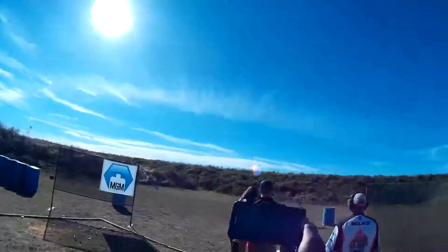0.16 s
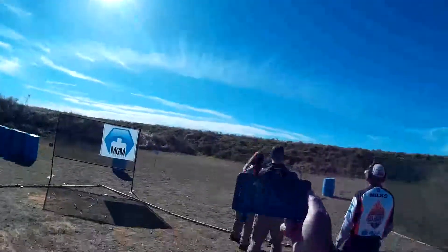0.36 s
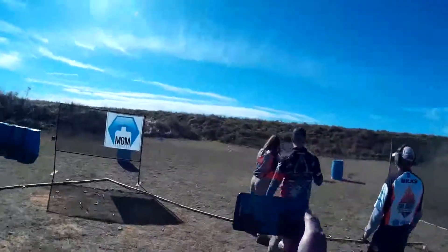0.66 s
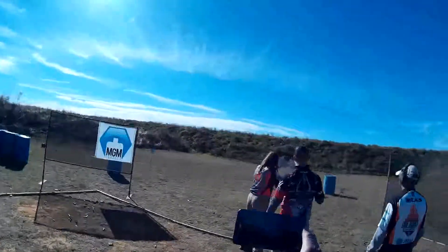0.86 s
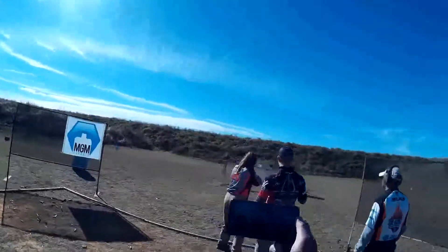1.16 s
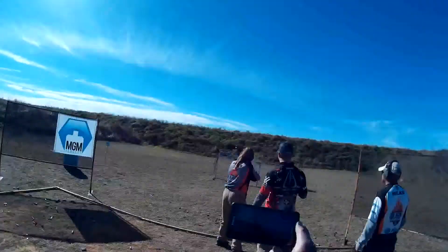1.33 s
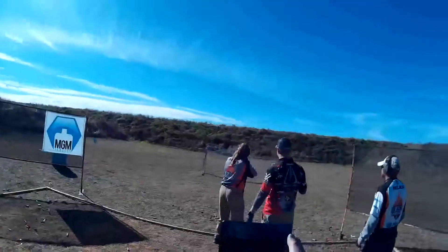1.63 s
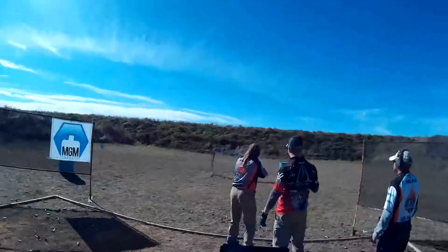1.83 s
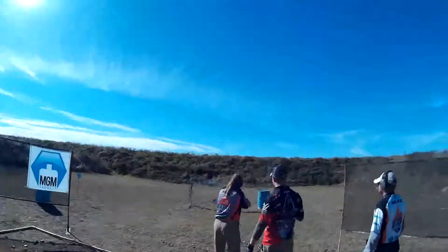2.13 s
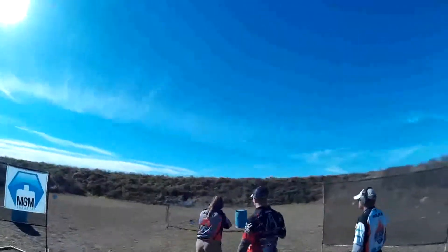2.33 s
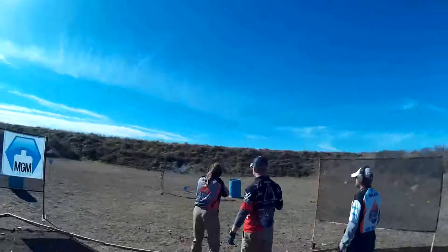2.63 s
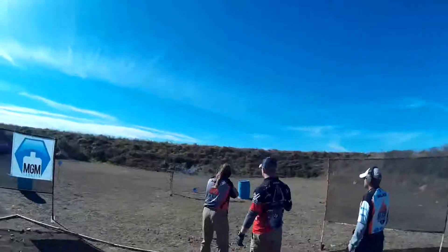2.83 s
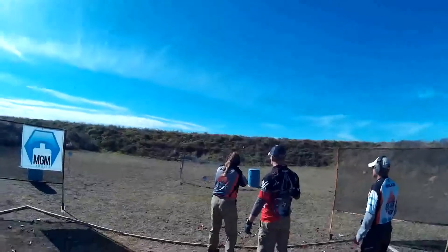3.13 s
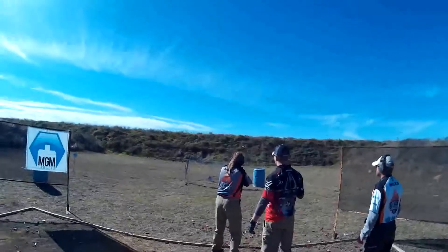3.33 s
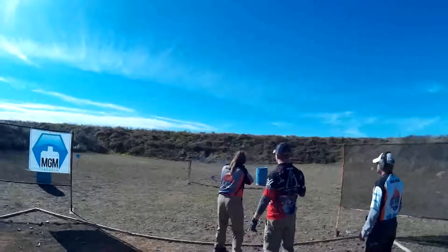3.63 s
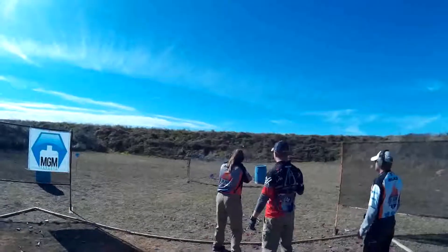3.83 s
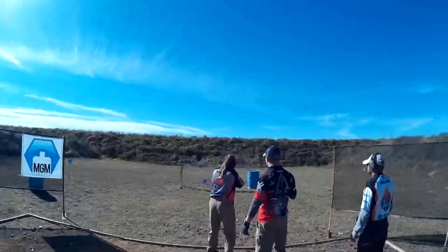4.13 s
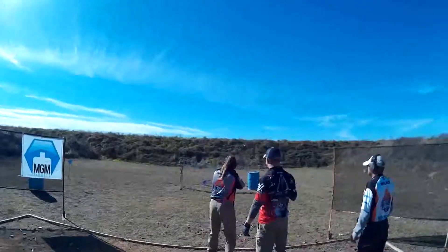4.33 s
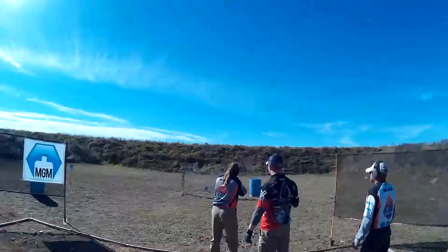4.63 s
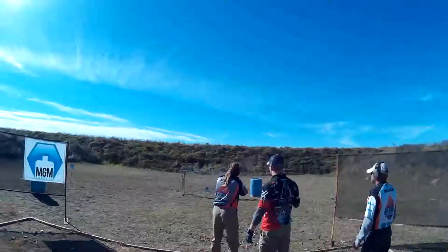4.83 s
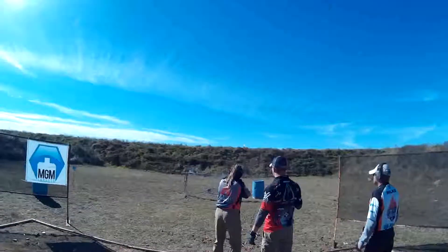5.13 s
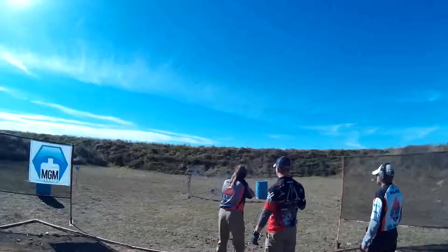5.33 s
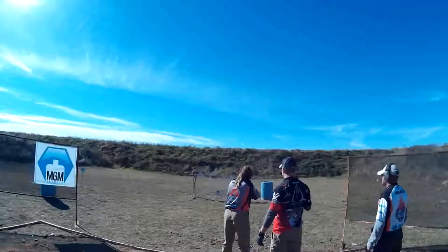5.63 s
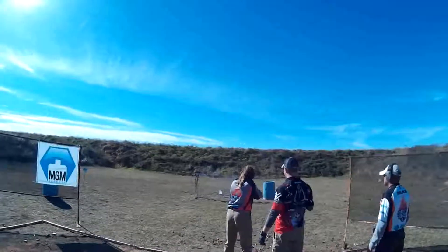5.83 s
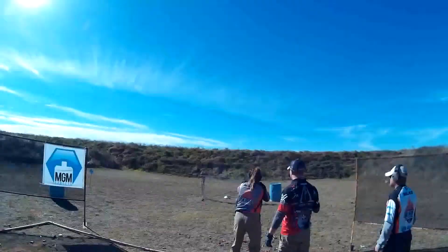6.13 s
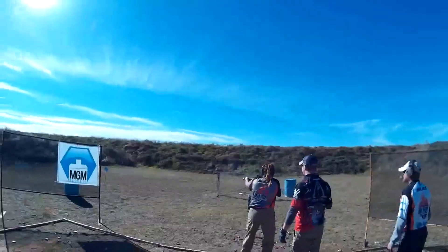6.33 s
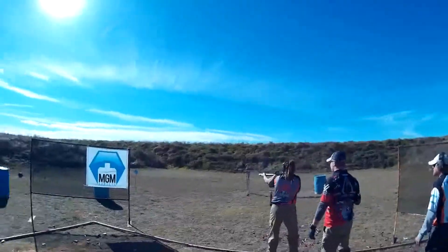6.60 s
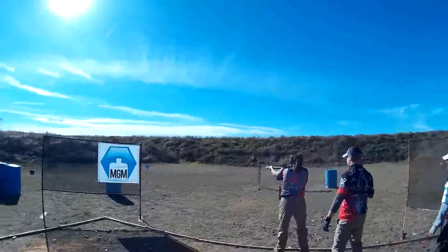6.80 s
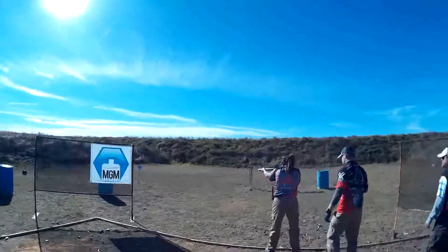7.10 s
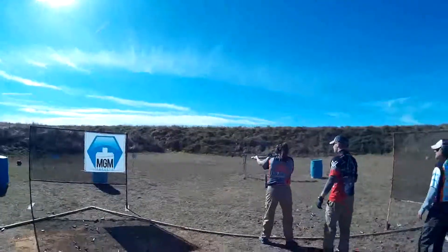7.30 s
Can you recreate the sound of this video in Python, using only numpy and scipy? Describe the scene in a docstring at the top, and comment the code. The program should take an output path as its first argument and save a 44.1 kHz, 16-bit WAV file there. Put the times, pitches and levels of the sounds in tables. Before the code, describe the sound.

Close, distorted handgun shots crack on an open-air range, a bit over half a second apart. The first five each strike a small steel plate with a bright ping and a clanking fall. Later shots are slightly slower, some without a hit, others ringing narrower or larger plates. After a pause with faint ticks, one last shot ends it. Short slap echoes return from earth banks; light wind fills the gaps.

```python
"""Handgun and steel plates

A handgun fires at steel plates on an open range walled by earth banks, a few metres from the microphone.
Blasts are short damped tones that overload the input, with barrel and screen echoes and noise off the banks.
Struck plates are beating sine modes, damped on landing; falls are resonant noise, knocks damped tones.
A light wind of coloured noise fills the gaps."""
import sys
import numpy as np
from scipy import signal
from scipy.fft import rfft, irfft, next_fast_len
from scipy.io import wavfile
from scipy.ndimage import uniform_filter1d, map_coordinates

SR = 44100
rng = np.random.default_rng(int(sys.argv[2]) if len(sys.argv) > 2 else 0)


def pcm_store(signal):
    """Save signal as 16-bit PCM."""
    levels = np.round(np.clip(np.atleast_2d(signal), -1, 1) * 32767)
    wavfile.write(sys.argv[1], SR, levels.astype(np.int16).T)


N = 328986

# Shots: (time [s], level [dB], near echo gain [dB], bank gain [dB], direct path gain [dB],
# gain of later scatter off shooter and ground [dB], lag of the first echoes [s])
SHOTS = [(0.3043, -0.5, -4, 0.5, -7, 2, -0.0042), (0.9386, 2, -0.5, -1.5, 3.5, -1, -0.0025),
         (1.5003, 1.5, 2, 0, 10.5, 2, .0004), (2.0199, -0.5, 1, 2, 4.5, 4, -0.002),
         (2.6244, -1.5, -0.5, 1.5, 9, 1.5, 0.0054), (3.321, -2, -1, 0.5, -4.5, 4.5, -0.0017),
         (4.1754, -2, -0.5, 2, -16, -2, .0002), (4.864, -0.5, 1.5, 2, 3, 4.5, -0.0016),
         (5.7102, -0.5, -3, -2, -7.5, 0.5, -0.0024), (7.4159, -2, 4.5, 3.5, -10.5, 5.5, -0.00045)]
# Direct blast: (level [dB], ring [Hz], T60 [s])
DIRECT_PATH = (2.1, 1600, .005)
# Echoes from barrels and screens, then from the banks: (delay [s], level [dB], T60 [s])
ECHO_PATHS = [(.032, 1, .006), (.0352, 4, .006), (.038, -2, .007), (.041, -2, .007), (0.0436, 5, .014),
              (.145, -17, .013), (.172, -16.5, .015), (.184, -13, .013), (.193, -20, .015),
              (.2445, -24, .012), (.34, -26.5, 0.015)]
# Diffuse swells off ground and banks: (delay [s], level [dB], fade [dB/s], extra treble [dB])
BANK_SWELLS = [(.001, -7.5, 596.5, 11), (.031, -12, 480, -7.5), (.05, -25, 82.5, 5.5),
               (.126, -28.5, 197, 9), (.165, -23, 256.5, 2.5), (.243, -30, 170.5, 10), (.3, -40, 71, 5)]
# Colour of the diffuse answer: (frequency [Hz], density [dB per Hz])
BANK_SPECTRUM = [(35, -60.5), (60, -32.5), (217, -9), (607, -7.5), (882, -3), (1280, -7.5), (2190, -15.5),
                 (2650, -25.5), (3760, -18.5), (6000, -24), (7750, -28.5), (8710, -34), (14200, -39),
                 (16000, -69)]

# Bullet strikes: (time [s], splash [dB], splash treble [dB], knock [dB], plate, ring [dB],
# ring treble [dB], extra fade [dB/s], edge-on after [s], back face gain [dB],
# extra back face fade [dB/s], lands after [s])
STRIKES = [(.3525, -14, -10.5, -6, "small", 0, 5.5, 1.5, .229, 3, 119, .33),
           (0.987, -29, -13, -1, "small", -2, 0.5, 68, 0.238, 16, 300, 0.34),
           (1.5494, -17.5, -10.5, -4, "small", -1.5, -2, 85, 0.233, 28.5, 550, 0.39),
           (2.067, -14, -9, -10, "small", -20.5, 21.5, 58.5, .228, 15, 57.5, .33),
           (2.6747, -12, -8, -12, "small", -23, 3.5, 67, .228, 4, 60, 0.28),
           (4.224, -15, 3, -16.5, "narrow", 2.4, -2.1, 1.1, 0.138, 0.8, 6.5, .37),
           (4.9123, -15.5, 1, -8, "narrow", -4.5, 0, 42.5, 0.25, 8, 5, .33),
           (5.764, -18, 1, -23, "large", -1.8, -1.7, -1.8, 0.098, -0.05, -3.5, .355)]
# Splash colour: (frequency [Hz], density [dB per Hz])
SPLASH_SPECTRUM = [(500, -25.5), (1200, -12), (1900, 2.5), (3200, -15.5), (4200, -3), (8000, -8),
                   (11000, -6.5), (15000, -18)]
# Plate modes, levels relative within a ring group: (frequency [Hz], level [dB])
SMALL_MODES = [(4544, -1), (7515, 5), (10900, -30.5), (12130, -34), (13390, -22.5)]
NARROW_MODES = [(4683, -0.5), (5690, -7), (7725, 6.5), (7989, 2.5), (8080, -6.5), (8732, -13.5), (10510, 1),
                (10810, -6.5), (11180, -17.5), (11460, -5), (12420, -5.5), (13770, -12.5)]
LARGE_MODES = [(839.8, -49), (990.5, -24), (1567, -36.5), (2083, -35.5), (2390, -44), (3004, -46),
               (3784, -36.5), (4000, -47.5), (4301, -53.5), (4915, -64), (5259, -41), (6342, -59.5),
               (6713, -44), (6955, -45.5), (7063, -46), (8021, -54), (8807, -68.5), (9453, -60.5),
               (9588, -54.5), (10454, -56.5), (10831, -47.5), (10885, -49), (11353, -69), (11795, -67),
               (12118, -69), (12349, -61), (12575, -65), (12818, -59)]
# Ring of each mode group: (upper limit [Hz], level [dB], fade [dB/s], beat [1/s], beat peak [s],
# beat depth [0-1], edge-on dip [0-1], back face gain [dB], landing drop [dB])
SMALL_GROUPS = [(6000, -30.5, 1, 5.2, .03, 0, 1, 1.2, 25.5), (20000, -32, 46, 15, .06, .5, 0.9, -4.5, 28)]
NARROW_GROUPS = [(5200, -35, 49, 8.2, .09, 0.18, 0.15, 1, 15), (6500, -32, 61, 7, 0.081, .8, .2, -1.5, 15),
                 (9500, -29, 55.4, 8.2, .07, .4, 0.48, 2, 15),
                 (20000, -28.5, 130, 11, .07, .4, 0.17, -1.5, 17)]
LARGE_GROUPS = [(1200, -27, 5, 5.6, 0.204, .8, .8, 11.4, 14.6), (1800, -33, 5, 3.9, .26, .6, .8, 4, 17),
                (2700, -39, 30, 9, .15, .4, .8, 16, 11.7), (3400, -19.5, 110, 9.5, 0.065, .7, 0.54, 1.7, 8),
                (3900, -17.5, 68, 9.8, 0.055, .85, .2, 3.8, 2.3), (4800, -28, 56, 7.3, .02, .4, .4, 0.3, 5),
                (5800, -29, 60, 4.1, 0.15, 0.4, .1, 3.5, 5), (7500, -23, 74, 5.4, 0.02, 0.5, .5, 10, 5.5),
                (20000, -24.5, 106, 5.2, 0.022, .8, .5, 14, 8.4)]
PLATES = {"small": (SMALL_MODES, SMALL_GROUPS), "narrow": (NARROW_MODES, NARROW_GROUPS),
          "large": (LARGE_MODES, LARGE_GROUPS)}

# Landings and bounces: (time [s], level [dB], T60 [s], treble [dB], pitch ratio of low resonances [-])
FALLS = [(.665, -6.5, 0.33, -8.5, 0.99), (.74, -21, 0.42, -5.5, 0.93), (0.802, -13.5, 0.29, -8.5, 1.06),
         (1.322, -8.5, 0.55, -4, 0.96), (1.391, -13, 0.23, -7, 1.07), (1.875, -4, 0.34, -2.5, 1.04),
         (1.983, -13, 0.42, -18.5, 1.06), (2.009, -13, 0.32, -1.5, 0.86), (2.611, -13, 0.81, -1.5, 1.02),
         (4.599, -5.5, 0.41, 2.5, 1.08), (4.737, -12, 0.29, 0, 1.03), (5.249, -5, 0.29, 2, 1.015),
         (5.335, -16, 0.16, 2, 1.07)]
# Clatter colour: (frequency [Hz], density [dB per Hz])
CLATTER_SPECTRUM = [(88, -70), (150, -38.5), (331, -17.5), (515, -22), (972, -3.5), (1350, -16.5),
                    (1770, -0.5), (3150, -21.5), (3970, -8.5), (4460, -23.5), (4810, -15.5), (10200, -31.5),
                    (15000, -54)]
# Narrow and broad resonances of plate and stand: (frequency [Hz], width [Hz], level [dB])
FRAME_RESONANCES = [(890, 100, -10), (1604, 28, 2), (2440, 56, -6), (4160, 84, -11), (5300, 400, -8),
                    (5400, 400, -8), (8000, 100, -16.5), (11200, 1000, -24)]
# Faint ticks and knocks: (time [s], level [dB], frequency [Hz], click [dB])
TICKS = [(.04, -33, 726, -24), (.119, -45, 670, -28), (3.133, -45, 1810, 1.5), (6.346, -31, 940, -27.5),
         (6.439, -36, 975, -28), (6.67, -40.5, 940, -21), (6.855, -43, 955, -11), (6.963, -43, 886, -22.5)]
# Dull thuds: (time [s], level [dB], frequency [Hz])
THUDS = [(1.103, -17, 197), (3.487, -2, 249)]
# Wind levels: (time [s], rumble [dB], rustle [dB])
WIND_LEVELS = [(0, -67, -47), (0.299, -50.5, -56), (1.999, -66, -58), (3.999, -63, -60),
               (5.601, -57, -55.5), (6.401, -59, -54.5), (7.46, -59, -58.5)]
# Wind colours: (frequency [Hz], density [dB per Hz])
RUMBLE_SPECTRUM = [(20, -33), (50, -3), (80, 2), (120, -4), (250, -36.5)]
RUSTLE_SPECTRUM = [(100, -7), (180, -2.5), (400, -7), (950, -7.5), (1500, -15.5), (2500, -27.5),
                   (4000, -30), (8000, -41.5), (16000, -55)]

# Scatter off shooter and ground: delay, loss and pitch step up per arrival
SCATTER_DELAY_S, SCATTER_DELAY_RATIO, SCATTER_DB, SCATTER_LOSS_DB = .002, 1.53, 11.5, 2.5
SCATTER_HZ, SCATTER_HZ_RATIO, SCATTER_MAX_HZ, SCATTER_T60_S = 390, 1.33, 1287, .0099
ECHO_HZ, BITE_LOSS_DB_PER_S = 973, 60.5  # far echoes arrive rounder
BANK_RISE_S = .0015
THUMP_DB, THUMP_DELAY_S, THUMP_S, SETTLE_S = -14, .002, .004, .06
KNOCK_HZ, KNOCK_T60_S = 1660, .022
EDGE_ON_S, LANDING_S, LYING_FADE_DB_PER_S, WAVER_DB = .011, .015, 74, 2.35
NOTCH_HZ, NOTCH_WIDTH_HZ, NOTCH_DEPTH = 3196, 180, .41
CLIP_LEVEL, TOP_HZ = .71, 16000


def amp(db):
    """Amplitude ratio of a level in dB."""
    return 10 ** (np.asarray(db) / 20)


def unit(x):
    """x scaled to rms 1."""
    return x / np.sqrt(np.mean(x ** 2) + 1e-20)


def along(points, hz):
    """Interpolate (Hz, value) points on a log frequency axis."""
    f, v = np.transpose(points)
    return np.interp(np.log(hz + 1), np.log(f + 1), v)


def wobble(rate_hz, count):
    """Smooth random curve through rate_hz knots a second."""
    knots = rng.standard_normal(int(count * rate_hz / SR + 4))
    return map_coordinates(knots, [np.arange(count) * rate_hz / SR])


def filtered(x, response):
    """Apply a complex response of frequency."""
    m = next_fast_len(x.shape[-1] + SR // 10)
    spectrum = rfft(x, m) * response(np.fft.rfftfreq(m, 1 / SR))
    return irfft(spectrum, m)[..., :x.shape[-1]]


def colored(x, spectrum):
    """Shape x by a spectrum table, to rms 1."""
    return unit(filtered(x, lambda hz: amp(along(spectrum, hz))))


def hiss(spectrum, count):
    """Coloured noise of rms 1."""
    return colored(rng.standard_normal(count), spectrum)


def patchy(spectrum, count, patchy_db):
    """Coloured noise whose gain varies in small patches of time and pitch."""
    z = signal.stft(rng.standard_normal(count + 512), nperseg=256)[2]
    field = uniform_filter1d(rng.standard_normal(z.shape), size=5, axis=0)
    field = uniform_filter1d(field, size=3, axis=1)
    rough = signal.istft(z * amp(patchy_db * unit(field)), nperseg=256)[1][:count]
    return colored(rough, spectrum)


def split(x, hz):
    """Parts below and above a soft corner."""
    low = filtered(x, lambda f: 1 / (1 + (f / hz) ** 2))
    return low, x - low


def add(track, s, sound):
    """Mix a sound in at time s."""
    spot = track[round(s * SR):][:len(sound)]
    spot += sound[:len(spot)]


def gun():
    """Shots: a blast along each path, an input thump and the diffuse answer of the banks."""
    out, blasts = np.zeros(N), np.zeros(N)
    t = np.arange(SR) / SR
    low_swell, high_swell = bank_envelopes(t)
    thump = overload_thump(t)
    ground = patchy(BANK_SPECTRUM, SR, patchy_db=4.5)  # shared: the range scatters shots nearly alike
    for s, db, echo_db, bank_db, *path_settings in SHOTS:
        for path_s, path_db, hz, t60_s in arrivals(echo_db, bank_db, *path_settings):
            pitch_dev, time_dev, level_dev = np.clip(rng.normal(size=3), -2, 2)
            blast = muzzle_blast(hz * (1 + .091 * pitch_dev), t60_s, path_s)
            add(blasts, s + path_s + .0002 * time_dev, amp(db + path_db + 2.9 * level_dev) * blast)
        low, high = split(unit(ground + .7 * patchy(BANK_SPECTRUM, SR, patchy_db=0)), hz=2550)
        mid, top = split(high, hz=6850)
        bright = amp(-12 * t) * (mid + amp(7 - 300 * t) * top)  # the top treble dies away first
        level = amp(db + bank_db + 1.6 * wobble(130, SR))
        add(out, s, level * (low_swell * low + high_swell * bright))
        add(out, s + THUMP_DELAY_S, amp(db + THUMP_DB) * thump)
    # the blasts carry little bass
    return out + filtered(blasts, lambda hz: (1j * hz / (1j * hz + 190)) ** 3)


def muzzle_blast(hz, t60_s, path_s):
    """Damped tone with two overtones behind a steep front; the upper one weakens with path delay."""
    t = np.arange(SR // 20) / SR
    turn = 2 * np.pi * hz * t
    bite = .21 * amp(-BITE_LOSS_DB_PER_S * path_s) * np.sin(5.7 * turn)
    wave = np.sin(turn + .59) + .24 * np.sin(2.1 * turn) + bite
    return amp(-60 * t / t60_s) * wave * (1 - np.exp(-t / .00017))


def arrivals(echo_db, bank_db, direct_db, scatter_db, lag_s):
    """Rows (delay [s], level [dB], ring [Hz], T60 [s]) of every path of one blast."""
    level_db, hz, t60_s = DIRECT_PATH
    rows = [(0, level_db + direct_db, hz, t60_s)]
    for k in range(6):
        scatter_level_db = SCATTER_DB - SCATTER_LOSS_DB * k + scatter_db * (k > 1)
        scatter_hz = min(SCATTER_HZ * SCATTER_HZ_RATIO ** k, SCATTER_MAX_HZ)
        rows.append((SCATTER_DELAY_S * SCATTER_DELAY_RATIO ** k, scatter_level_db,
                     scatter_hz, SCATTER_T60_S))
    for s, db, t60_s in ECHO_PATHS:
        gain_db = echo_db if s < .1 else bank_db
        rows.append((s + lag_s * (s < .04), db + gain_db, ECHO_HZ, t60_s))
    return rows


def bank_envelopes(t):
    """Low and high envelopes: one decaying swell per surface, summed in power."""
    delay_s, level_db, fade_db_per_s, treble_db = np.transpose(BANK_SWELLS)[..., None]
    since = np.maximum(t - delay_s, 0)
    swells = (1 - np.exp(-since / BANK_RISE_S)) * amp(level_db - fade_db_per_s * since)
    return np.linalg.norm(swells, axis=0), np.linalg.norm(swells * amp(treble_db), axis=0)


def overload_thump(t):
    """Low thump of the overloaded input, swinging under and settling."""
    pulse = t / THUMP_S * np.exp(1 - t / THUMP_S)
    under = np.e * THUMP_S / SETTLE_S * np.exp(-t / SETTLE_S) * (1 - np.exp(-t / THUMP_S))
    return pulse - under


def plates():
    """Strikes: lead splash, short knock of lead on steel, plate ring."""
    out, t = np.zeros(N), np.arange(SR // 20) / SR
    for s, db, treble_db, knock_db, *ringing in STRIKES:
        add(out, s, splash(db, treble_db))
        knock_hz = KNOCK_HZ * (1 + .034 * rng.normal())
        add(out, s, amp(knock_db - 60 * t / KNOCK_T60_S) * np.sin(2 * np.pi * knock_hz * t))
        add(out, s, ring(*ringing))
    return out


def ring(plate, ring_db, treble_db, fade_db_per_s, edge_s, back_db, back_fade_db_per_s, lands_s):
    """A struck plate beats and fades, dips edge-on, shows its back face and is damped on landing."""
    modes, groups = PLATES[plate]
    t = np.arange(round((lands_s + .35) * SR)) / SR
    tones = np.zeros((len(groups), len(t)))
    for hz, db in modes:
        drift_rad = .48 * np.sqrt(hz / 1000) * wobble(45, len(t))  # scattered paths blur the phase
        k = np.searchsorted([g[0] for g in groups], hz)
        tones[k] += amp(db + WAVER_DB * wobble(35, len(t))) * np.sin(2 * np.pi * hz * t + drift_rad)
    edge_on = np.exp(-((t - edge_s) / EDGE_ON_S) ** 2)
    turned = np.clip(.5 + (t - edge_s) / EDGE_ON_S / 2, 0, 1)
    landed = np.clip((t - lands_s) / LANDING_S, 0, 1)
    late_db = back_fade_db_per_s * np.maximum(t - edge_s, 0)
    late_db += LYING_FADE_DB_PER_S * np.maximum(t - lands_s, 0)
    out = np.zeros(len(t))
    for tone, group in zip(tones, groups):
        top_hz, db, own_fade_db_per_s, beat_hz, peak_s, depth, dip, own_back_db, drop_db = group
        second = depth * (1 - .6 * landed)  # lying down, one of the pair is damped more
        beating = np.abs(1 + second * np.exp(2j * np.pi * beat_hz * (t - peak_s))) / (1 + depth)
        level_db = ring_db + db + treble_db * (top_hz > 7000)
        level_db = level_db - (own_fade_db_per_s + fade_db_per_s) * t
        level_db += (back_db + own_back_db) * turned - drop_db * landed - late_db
        out += amp(level_db) * beating * (1 - dip * edge_on) * unit(tone)
    return np.clip(np.minimum(t, t[-1] - t) / .006, 0, 1) * out


def splash(db, treble_db):
    """Lead bursts on steel: coloured noise with a fast and a slower decay."""
    t = np.arange(SR // 10) / SR
    low, high = split(hiss(SPLASH_SPECTRUM, len(t)), hz=4500)
    decay = amp(-60 * t / .056) + amp(-16 - 60 * t / .023)
    return amp(db) * (low + amp(treble_db) * high) * decay


def frame_response(f):
    """Plate and stand: summed bandpass resonances of alternating sign."""
    total = 0
    for k, (center, width, db) in enumerate(FRAME_RESONANCES):
        total = total + (-1) ** k * amp(db) * 1j * f * width / (center ** 2 - f ** 2 + 1j * f * width)
    return total


def falls():
    """Toppled plate against stand: lumpy noise plus noise through narrow and broad resonances."""
    out, t = np.zeros(N), np.arange(SR // 2) / SR
    attack = 1 - np.exp(-t / .0008)
    for s, db, t60_s, treble_db, pitch in FALLS:
        def shift(hz):
            """Full pitch ratio below 2500 Hz, none above 4000 Hz."""
            return hz * pitch ** np.clip((4000 - hz) / 1500, 0, 1)

        spectrum = [(shift(hz), level) for hz, level in CLATTER_SPECTRUM]
        clatter = patchy(spectrum, len(t), patchy_db=1.5)
        noise = rng.standard_normal(len(t))
        resonant = unit(filtered(noise, lambda f: frame_response(f * f / shift(f + 1))))
        low, high = split(clatter + .45 * resonant, hz=3980)
        level = amp(db - 9 - 60 * t / t60_s + 1.8 * wobble(140, len(t)))
        add(out, s, attack * level * (low + amp(treble_db - 34 * t) * high))
    return out


def ticks_and_thuds():
    """Short damped tones; the ticks carry a noise click."""
    out, t = np.zeros(N), np.arange(SR // 10) / SR
    click_spectrum = [(800, -17), (2500, 10), (5500, -18), (8000, -30)]  # (frequency [Hz], density [dB])
    for s, db, hz, click_db in TICKS:
        knock = np.sin(2 * np.pi * hz * t) + amp(click_db) * hiss(click_spectrum, len(t))
        add(out, s, amp(db - 60 * t / .036) * knock * (1 - np.exp(-t / .00083)))
    for s, db, hz in THUDS:
        add(out, s, amp(db - 60 * t / .019) * np.sin(2 * np.pi * hz * t) * (1 - np.exp(-t / .0028)))
    return out


def wind():
    """Low flutter on the microphone and a thin rustle: coloured noise of wavering level."""
    s, rumble_db, rustle_db = np.transpose(WIND_LEVELS)
    t = np.arange(N) / SR
    rumble = amp(np.interp(t, s, rumble_db) + 2 * wobble(4.2, N)) * hiss(RUMBLE_SPECTRUM, N)
    rustle = amp(np.interp(t, s, rustle_db) + .5 * wobble(14, N)) * hiss(RUSTLE_SPECTRUM, N)
    return rumble + rustle


def scene():
    """Sum of all layers, one channel."""
    return (gun() + plates() + falls() + ticks_and_thuds() + wind())[None]


def record(dry):
    """Hard-clipping input stage, narrow dip of the microphone, band limit."""
    clipped = dry / (1 + np.abs(dry / CLIP_LEVEL) ** 12) ** (1 / 12)
    dipped = filtered(clipped, lambda hz: 1 - NOTCH_DEPTH * np.exp(-((hz - NOTCH_HZ) / NOTCH_WIDTH_HZ) ** 2))
    return filtered(dipped, lambda hz: 1 / (1 + (hz / TOP_HZ) ** 70))


dry = scene()
out = record(dry)
pcm_store(out)
```